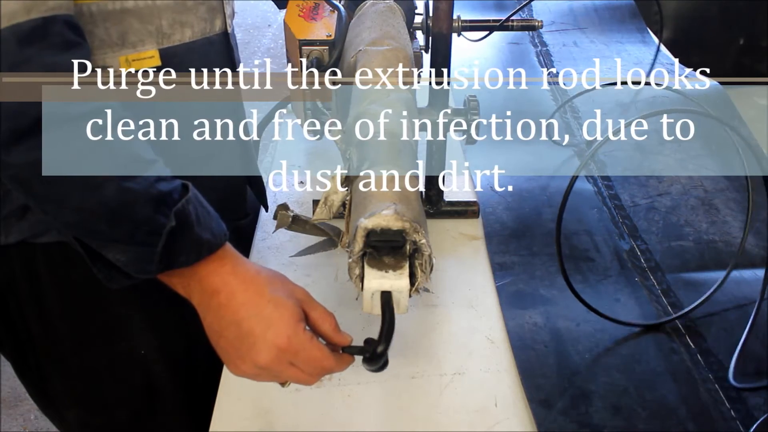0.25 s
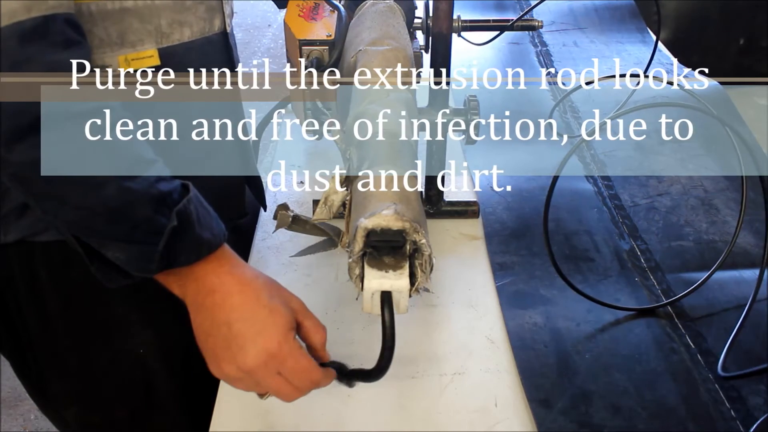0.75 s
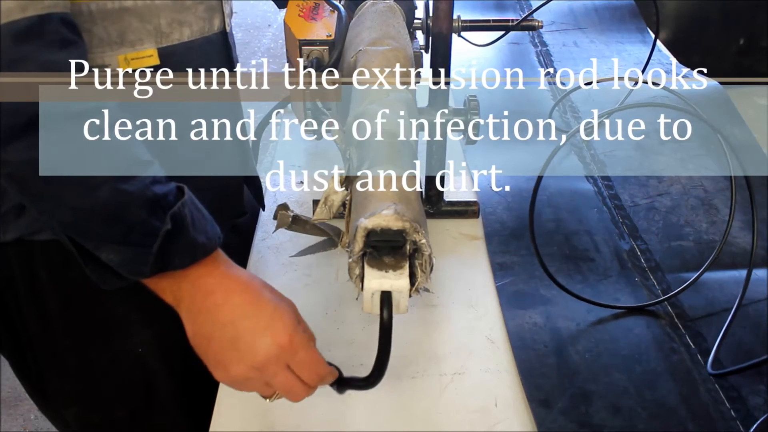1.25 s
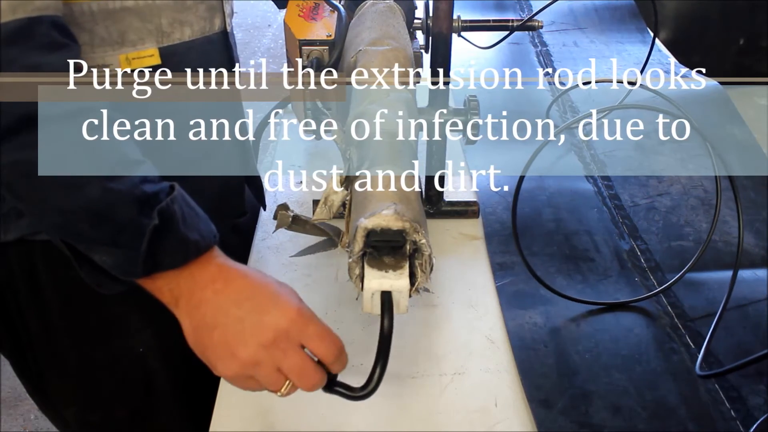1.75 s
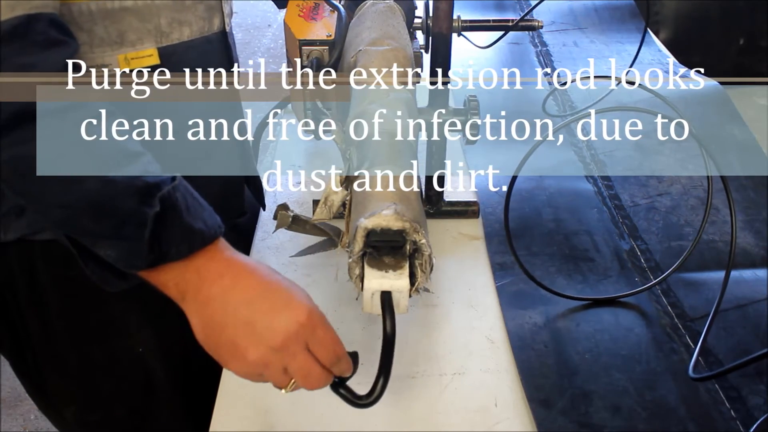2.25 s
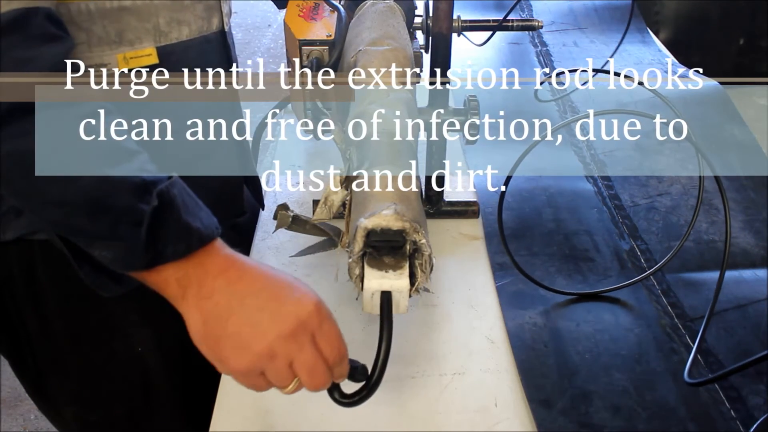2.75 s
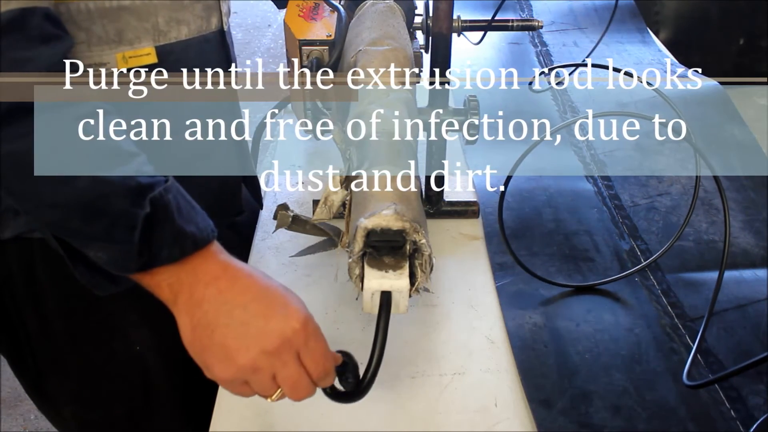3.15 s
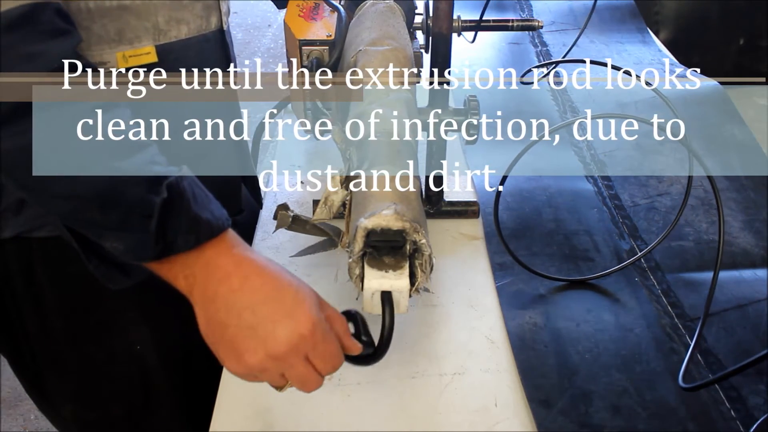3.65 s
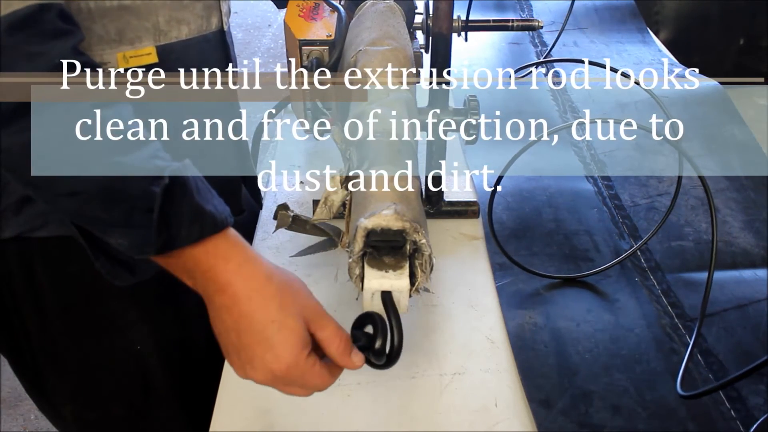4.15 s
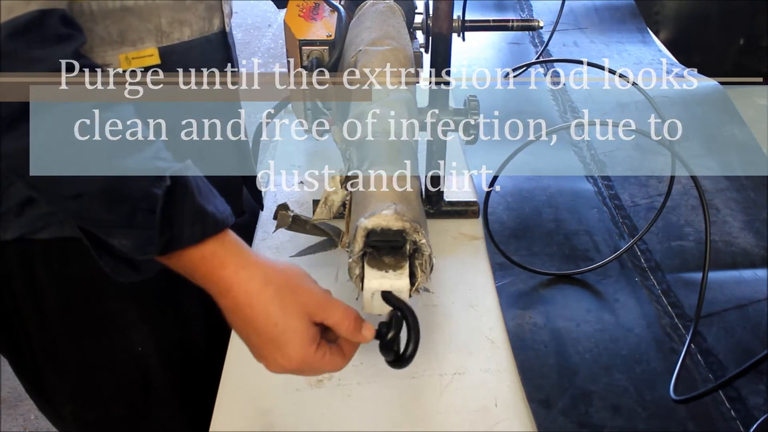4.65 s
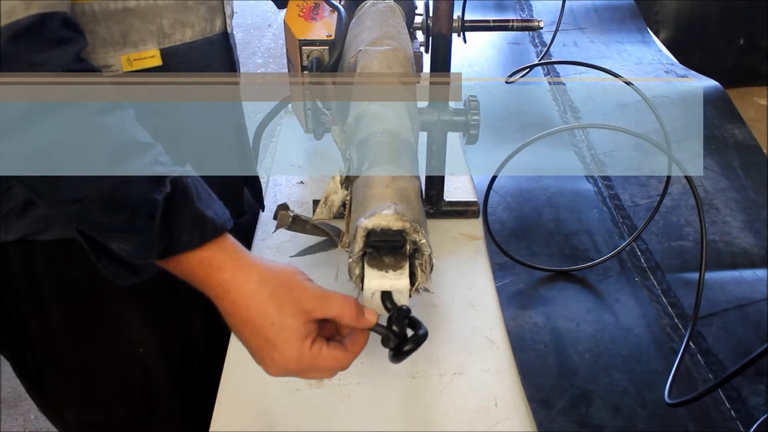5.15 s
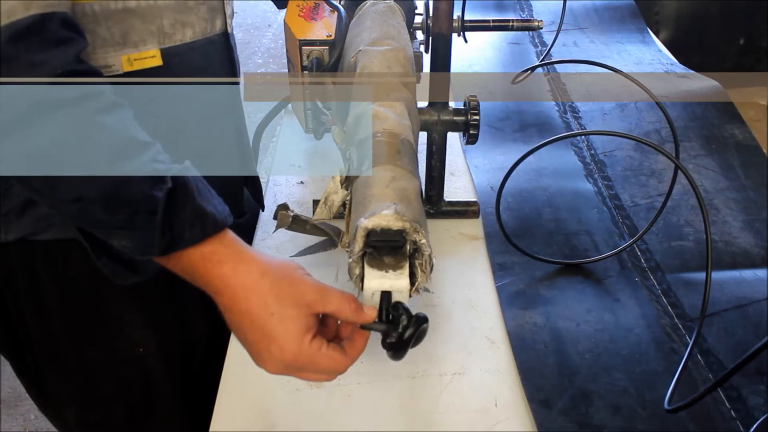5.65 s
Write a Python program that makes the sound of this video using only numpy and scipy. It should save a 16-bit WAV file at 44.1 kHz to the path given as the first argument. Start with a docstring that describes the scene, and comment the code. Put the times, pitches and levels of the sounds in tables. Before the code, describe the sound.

A hand-held plastic welding gun is already running on a workbench at the start. Its drill-like motor gives a steady, medium-pitched hum with many higher whining tones above it, wobbling gently about three times a second. A fine gearbox rattle and an even hiss of cooling air blend with it, over a faint, lumpy rumble from the bench. Several small swells pass between about 0.4 and 2.3 seconds, and the level lifts slightly again around 2.7 seconds. From about 3 seconds the motor sags a little under load, reaching its lowest pitch near 4 seconds, then recovers by about 5.2 seconds. Meanwhile the whole sound grows gradually quieter, with slight swells near 3.8, 4.1 and 5.5 seconds. The machine is noticeably softer but still running at the end, near 6 seconds. Everything stays centred in mono.

```python
"""At a workbench, a hand-held extrusion welding gun pushes out melted rod.
Its drill motor spins about 320 times a second and slows a little once per turn of the feed screw.
The shaft, fan and gears whine, the gearbox rattles, cooling air rushes and the bench rumbles below.
The whole machine slowly grows quieter, with short swells along the way."""
import sys
import numpy as np
from scipy import signal
from scipy.fft import rfft, irfft, next_fast_len
from scipy.io import wavfile

SR = 44100
rng = np.random.default_rng(int(sys.argv[2]) if len(sys.argv) > 2 else 0)


def wav_out(sig):
    """Save sig, one row per channel (or a flat mono array), as 16-bit PCM at SR to the path in sys.argv[1]."""
    wavfile.write(sys.argv[1], SR, np.round(np.clip(np.atleast_2d(sig).T, -1, 1) * 32767).astype(np.int16))


N = 259749

# Motor speeds at which the strong tones' levels are given: turns_per_s
MOTOR_SPEEDS = (313, 316, 318, 320, 322, 324, 326)
# Strong tones (off-balance shaft, hum, two upper tones, fan): cycles_per_turn, level_db at each speed
STRONG_TONES = [(1, -33, -32.5, -34.5, -31.5, -30, -26.5, -25.5),
                (2, -20, -24.5, -25.5, -24, -25, -25.5, -22.5),
                (4, -29.5, -27.5, -26.5, -28, -27, -26, -28.5),
                (6, -23.5, -26.5, -23.5, -28.5, -29.5, -38, -32),
                (18, -38, -35, -35, -30.5, -31.5, -35, -29.5)]
# How the same five tones waver: flutter_depth, flutter_hz, screw_throb_db, lag_s
TONE_WAVER = [(0.09, 21, 0, 0.0294), (0.089, 28, 0.3, 0.026), (0.34, 30, -0.24, 0.011),
              (0.25, 39, 0.2, 0.0027), (0.31, 40, -0.5, .002)]

def motor_hum(turns, speed, screw_swing):
    """The strong tones swell and fade as the changing speed slides them through the gun's resonances."""
    t, hum = np.arange(N) / SR, 0
    for (per_turn, *levels_db), (flutter, flutter_hz, throb_db, lag_s) in zip(STRONG_TONES, TONE_WAVER):
        level_db = np.interp(speed, MOTOR_SPEEDS, levels_db) + throb_db * screw_swing
        delayed_db = np.interp(t - lag_s, t, level_db)
        hum += from_db(delayed_db) * shaft_tone(turns, per_turn, flutter, flutter_hz)
    return hum


# The motor's cruising speed, which drops when the melt pushes back: time_s, turns_per_s
CRUISING_SPEED = [(0.0, 323.6), (0.5, 321.1), (1.3, 324.1), (1.6, 322.8), (2.4, 324.1), (2.5, 321.6),
                  (2.7, 322.1), (2.99, 319.0), (3.19, 319.9), (3.69, 318.2), (3.99, 315.1), (4.09, 317.2),
                  (4.49, 316.6), (4.59, 318.4), (5.09, 319.2), (5.19, 322.0), (5.39, 320.3), (5.89, 322.4)]

def motor_motion(gear_ratio=96.4, easiest_s=0.2, swing_hz=2.81, light_load_hz=323.5, heavy_load_hz=319):
    """Give the speed in turns a second, the screw's swing (-1 to 1) and the load (0 light, 1 heavy)."""
    cruise, = curves_in_time(CRUISING_SPEED)
    screw_turns = np.cumsum(cruise) / SR / gear_ratio
    # The motor runs fastest at the one angle where the screw turns most easily.
    screw_swing = np.cos(2 * np.pi * (screw_turns - screw_turns[int(easiest_s * SR)]))
    load = np.clip((light_load_hz - cruise) / (light_load_hz - heavy_load_hz), 0, 1)
    tremble = 1 + 0.000907 * drift(rate_hz=22)  # from slack in the gears
    return (cruise + swing_hz * screw_swing) * tremble, screw_swing, load


# The rotor's weaker tones: cycles_per_turn, light_load_db, heavy_load_db
ROTOR_TONES = [(3, -33.5, -34), (5, -42, -37.5), (7, -39.5, -38.5), (8, -36, -45), (9, -47.5, -45.5),
               (10, -40, -42), (12, -35, -35.5), (14, -42.5, -41.5), (15, -51, -51), (20, -39, -56),
               (22, -40.5, -41.5), (23, -41, -52), (24, -42.5, -44), (26, -44.5, -45), (27, -53, -45),
               (30, -46.5, -44.5), (31, -70, -64), (34, -52, -51), (36, -46, -50), (37, -59, -54),
               (39, -49, -58), (41, -46, -59), (42, -50, -57), (43, -56, -55), (44, -57, -49),
               (47, -58, -61)]

def rotor_whine(turns, load):
    """The spinning rotor sings at whole multiples of its speed; higher tones are shakier."""
    return sum(from_db(light_db + load * (heavy_db - light_db))
               * shaft_tone(turns, per_turn, flutter=0.2 + 0.011 * per_turn, flutter_hz=10.6)
               for per_turn, light_db, heavy_db in ROTOR_TONES)


# Tones between the rotor's whole multiples: cycles_per_turn, light_load_db, heavy_load_db
IN_BETWEEN_TONES = [(0.8, -54, -52.5), (1.31, -49.5, -49), (1.62, -47.5, -48.5), (3.58, -39.5, -41),
                    (3.68, -63, -42), (4.09, -37.5, -33.5), (4.78, -37, -45.5), (4.91, -37, -38),
                    (5.86, -38, -38), (6.41, -43.5, -41), (8.18, -52, -47), (12.27, -42.5, -54),
                    (16.36, -58, -41.5)]

def in_between_whine(turns, load):
    """Gear whine and a faint mains-power tone sound in between the rotor's tones."""
    return sum(from_db(light_db + load * (heavy_db - light_db))
               * shaft_tone(turns, per_turn, flutter=0.34, flutter_hz=7.4)
               for per_turn, light_db, heavy_db in IN_BETWEEN_TONES)


# How the noise pulses within one motor turn: pulses_per_turn, depth
ROTOR_PULSES = [(1, 0.11), (2, 0.098), (4, 0.14), (5, 0.21)]
# How strong the noise is from low to high: pitch_hz, level_db
NOISE_SHAPE = [(30, -41), (70, -37), (120, -21.5), (200, -11.5), (320, -9.5), (520, -0.5), (1000, 0),
               (2200, 0.9), (4500, -2.5), (6200, -3.5), (9000, -9), (12500, -11.5), (15400, -15.5)]
# Fixed pitches at which the noise rings, from gun, bench and room: pitch_hz, width_hz, level_db
RINGING_PITCHES = [(824, 16.5, 4), (1598, 37, -6.5), (2150, 140, -12.5), (2646, 20, -11), (2880, 40, -11),
                   (3345, 100, -3), (3920, 63, -1.5), (5350, 140, -1), (5680, 60, 0), (6060, 190, -4.5),
                   (6930, 200, -15), (7750, 170, -5), (9720, 170, -12), (11500, 250, -18)]

def machine_noise(turns, grain_db, grain_hz, wheel_per_turn=3 / 22, wheel_depth=0.048):
    """Uneven noise, chopped by the rotor and the first gear wheel, rings at fixed pitches."""
    rotor_chop = 1 + sum(depth * np.cos(2 * np.pi * (per_turn * turns + rng.random()))
                         for per_turn, depth in ROTOR_PULSES)
    wheel_chop = 1 + wheel_depth * np.cos(2 * np.pi * wheel_per_turn * turns)
    chopped = rng.standard_normal(N) * rotor_chop * wheel_chop
    grainy = chopped * from_db(grain_db * drift(grain_hz))
    noise = shape_noise(unit_level(grainy), NOISE_SHAPE)
    return noise + sum(from_db(db) * resonance(noise, hz, width) for hz, width, db in RINGING_PITCHES)


def gearbox_rattle(turns, below_hz):
    """The gearbox makes the lower and middle part of the machine's noise."""
    keep_lows = signal.butter(2, below_hz, "low", fs=SR, output="sos")
    return signal.sosfilt(keep_lows, machine_noise(turns, grain_db=0.4, grain_hz=70.4))


def cooling_air(turns, above_hz):
    """Rushing air makes the high, hissing part of the machine's noise."""
    keep_highs = signal.butter(2, above_hz, "high", fs=SR, output="sos")
    return signal.sosfilt(keep_highs, machine_noise(turns, grain_db=0.35, grain_hz=90))


# How strong the bench's rumble is from low to high: pitch_hz, level_db
RUMBLE_SHAPE = [(25, -52), (70, -46), (150, -55), (400, -70)]

def bench_rumble(lumps_db=4, lumps_hz=12):
    """The bench under the gun gives a low, lumpy rumble."""
    lumpy = rng.standard_normal(N) * from_db(lumps_db * drift(lumps_hz))
    return shape_noise(lumpy, RUMBLE_SHAPE)


# The slow fall in loudness: time_s, level_db
SLOW_FADE = [(0, 0.3), (1.2, -0.15), (2.1, -1.3), (2.5, -1.8), (2.7, -0.2), (3.05, -0.5), (3.6, -3),
             (4.3, -4.1), (5, -5), (5.35, -7), (5.89, -7.5)]
# Short swells of the whole sound: peak_s, length_s, boost_db
SWELLS = [(0.426, 0.38, 1.6), (0.827, 0.069, 2.5), (1.052, 0.24, 2.3), (1.38, .1, 1.5), (1.636, 0.21, 2.4),
          (1.948, 0.16, 1.8), (2.306, 0.19, 1.5), (3.777, 0.22, 1.4), (4.11, .08, 1.4), (4.66, 0.053, 1.2),
          (5.514, 0.14, 1.4)]

def loudness(waver_db=0.26, waver_hz=6):
    """The whole sound slowly gets quieter, swells briefly and wavers a little."""
    t = np.arange(N) / SR
    fade_db, = curves_in_time(SLOW_FADE)
    swells_db = sum(db * np.exp(-(2 * (t - peak_s) / length_s) ** 2) for peak_s, length_s, db in SWELLS)
    return from_db(fade_db + swells_db + waver_db * drift(waver_hz))


def shaft_tone(turns, per_turn, flutter, flutter_hz):
    """One tone that follows the shaft's turning; flutter shakes its strength and timing."""
    shake = 1 + flutter * (drift(flutter_hz) + 1j * drift(flutter_hz))
    steady = np.exp(2j * np.pi * (per_turn * turns + rng.random()))
    return unit_level(np.real(shake * steady))


def resonance(x, pitch_hz, width_hz):
    """Let through a narrow band around one pitch, so that it rings."""
    r = np.exp(-np.pi * width_hz / SR)
    feedback = [1, -2 * r * np.cos(2 * np.pi * pitch_hz / SR), r * r]
    return signal.lfilter(np.array([1, 0, -1]) * (1 - r * r) / 2, feedback, x)


def shape_noise(x, shape):
    """Turn each pitch in x up or down along a curve of (pitch_hz, level_db) points."""
    size = next_fast_len(N)
    pitch_hz, level_db = np.transpose(shape)
    bins_hz = np.maximum(np.fft.rfftfreq(size, 1 / SR), 1)
    gain = from_db(np.interp(np.log(bins_hz), np.log(pitch_hz), level_db))
    return irfft(rfft(x, size) * gain, size)[:N]


def drift(rate_hz, step=40):
    """A smooth random wander, about 1 in size, that changes about rate_hz times a second."""
    r = np.exp(-2 * np.pi * step * rate_hz / SR)
    noise = rng.standard_normal(N // step + 2002)
    slow = signal.lfilter([1], [1, -2 * r, r * r], noise)[2000:]  # skip while the filter settles
    return np.interp(np.arange(N) / step, np.arange(len(slow)), unit_level(slow))


def curves_in_time(rows):
    """Join a table's points with straight lines, giving a value at every sample."""
    time_s, *columns = np.transpose(rows)
    return [np.interp(np.arange(N) / SR, time_s, column) for column in columns]


def unit_level(x):
    """Scale x so its average strength (rms) is 1."""
    return x / np.sqrt(np.mean(x ** 2) + 1e-20)


def from_db(db):
    """Turn decibels into a number to multiply by."""
    return 10 ** (np.asarray(db) / 20)


def scene(split_hz=7000):
    """Mix the tones and noises under one shared loudness, the same in both channels."""
    speed, screw_swing, load = motor_motion()
    turns = np.cumsum(speed) / SR
    hum = motor_hum(turns, speed, screw_swing)
    whine = from_db(0.97) * rotor_whine(turns, load) + from_db(2.2) * in_between_whine(turns, load)
    rattle = from_db(-16.5) * gearbox_rattle(turns, below_hz=split_hz)
    air = from_db(-16) * cooling_air(turns, above_hz=split_hz)
    mix = loudness() * (hum + whine + rattle + air + bench_rumble())
    return np.array([mix] * 2)


def record(dry):
    """Cut away the very highest hiss, above 15650 Hz."""
    return signal.sosfilt(signal.ellip(12, 0.1, 80, 15650, fs=SR, output="sos"), dry)


dry = scene()
out = record(dry)
wav_out(out)
```